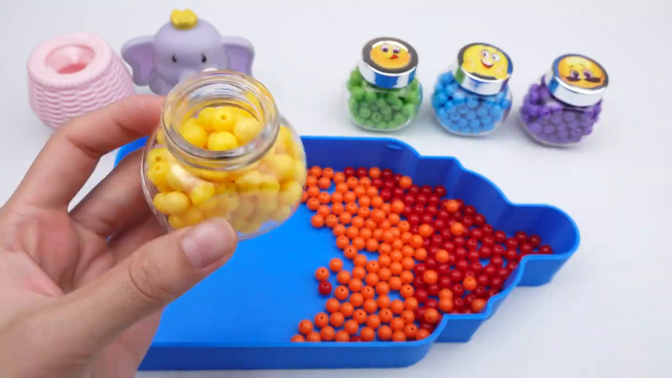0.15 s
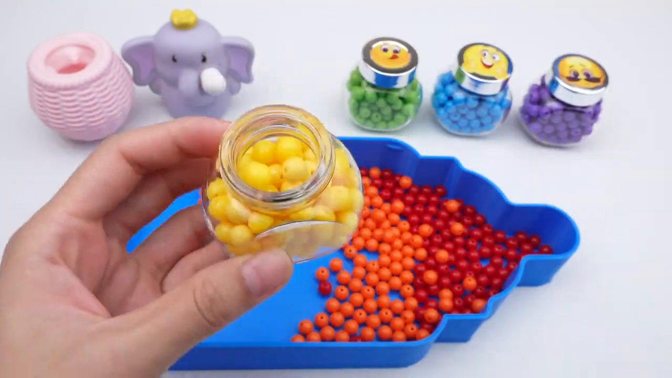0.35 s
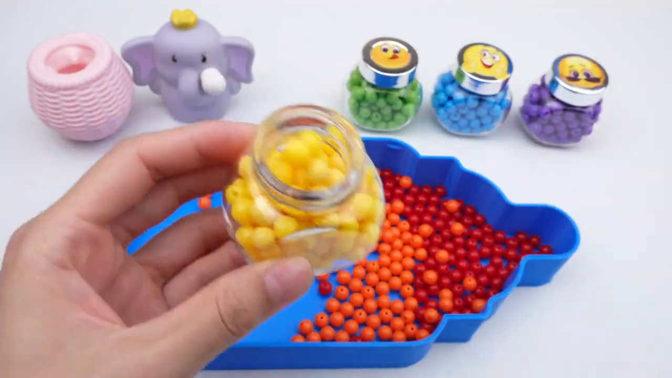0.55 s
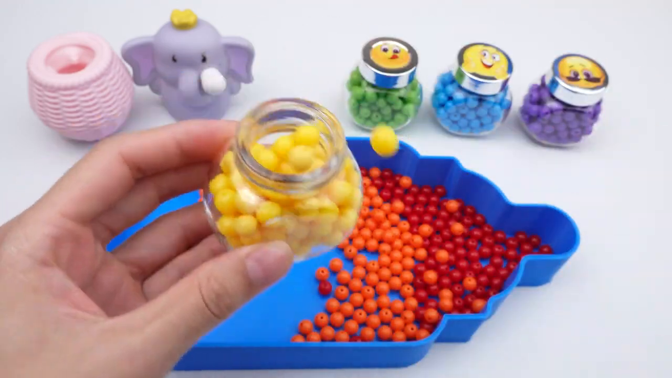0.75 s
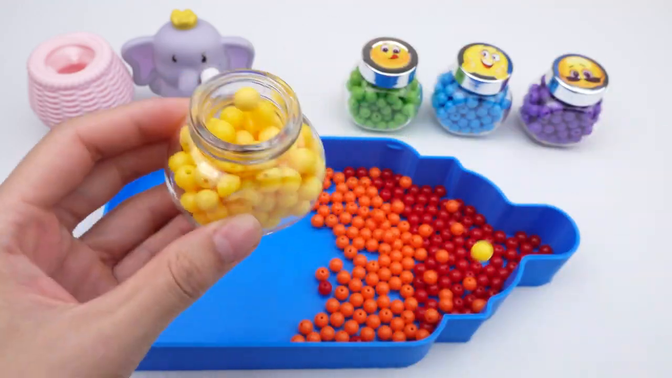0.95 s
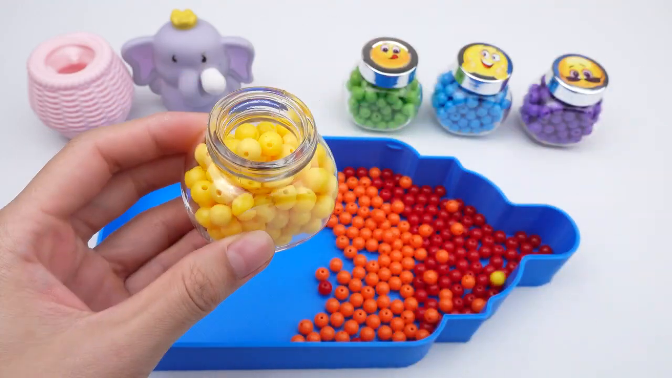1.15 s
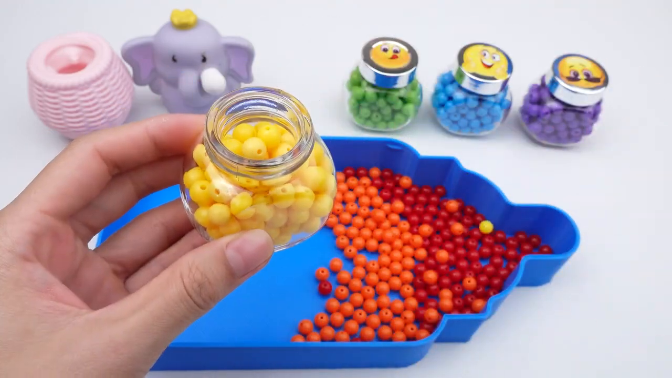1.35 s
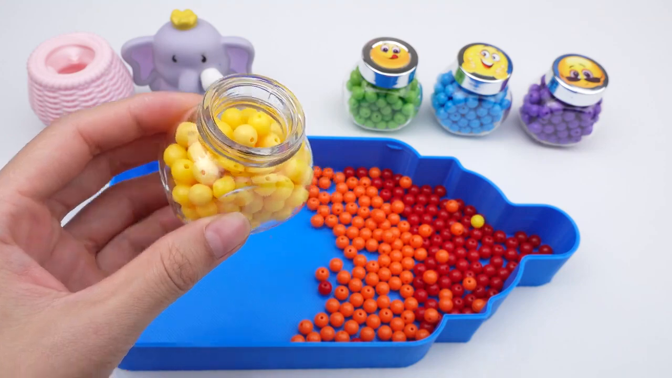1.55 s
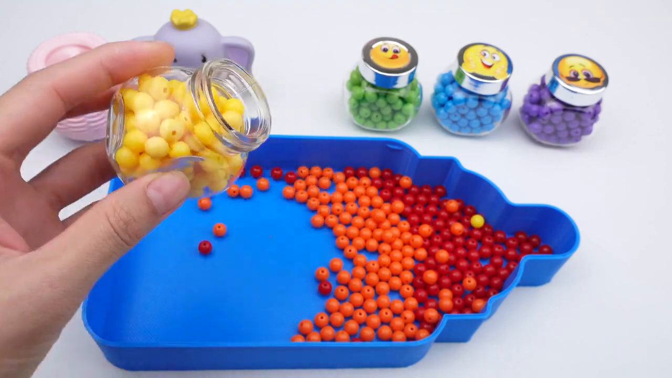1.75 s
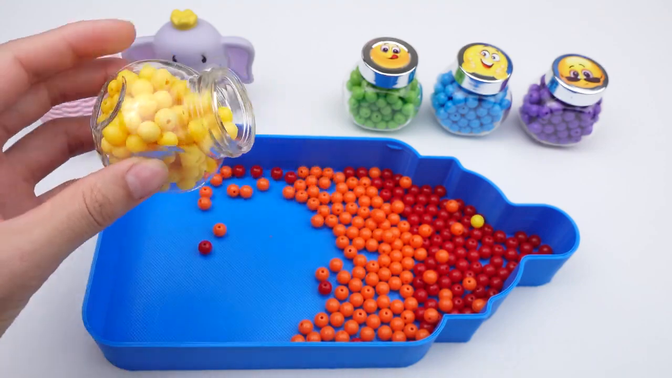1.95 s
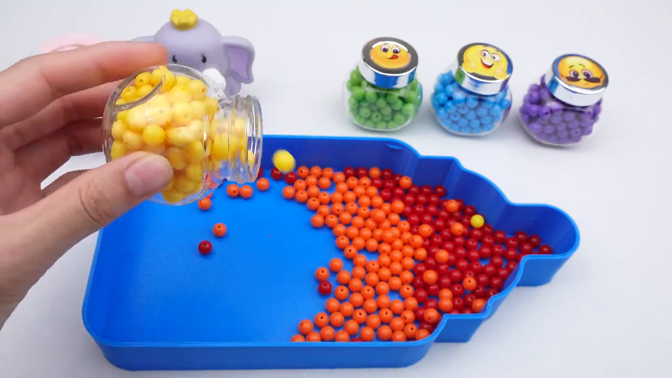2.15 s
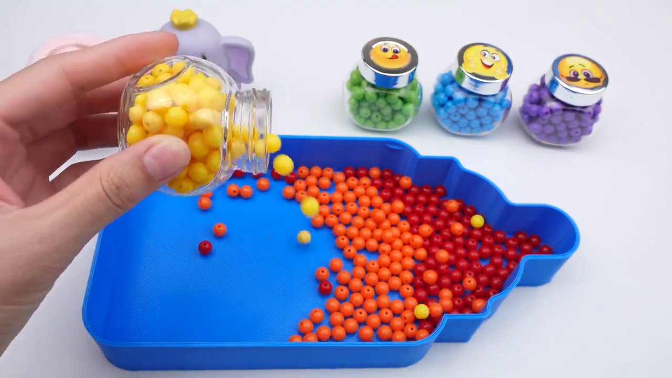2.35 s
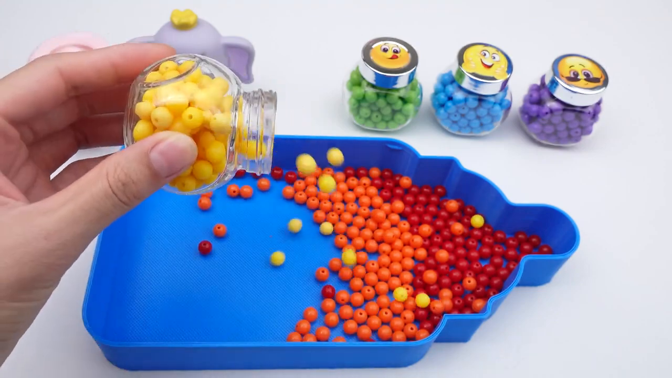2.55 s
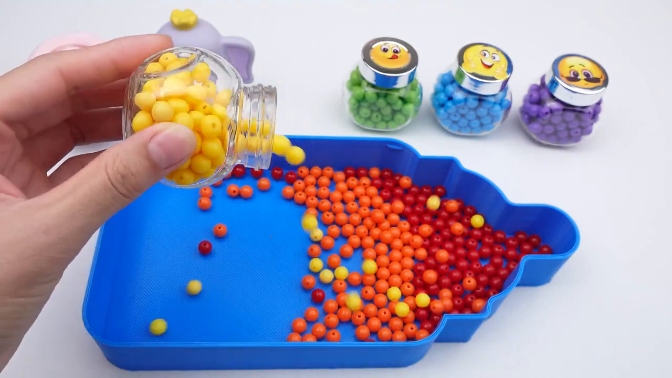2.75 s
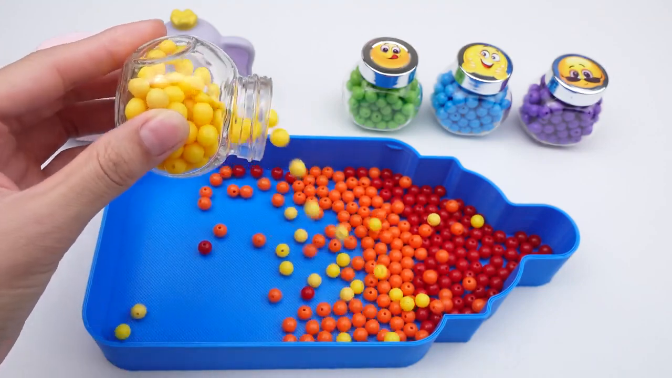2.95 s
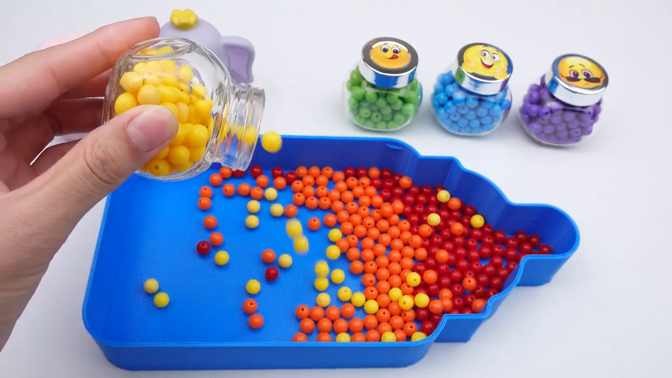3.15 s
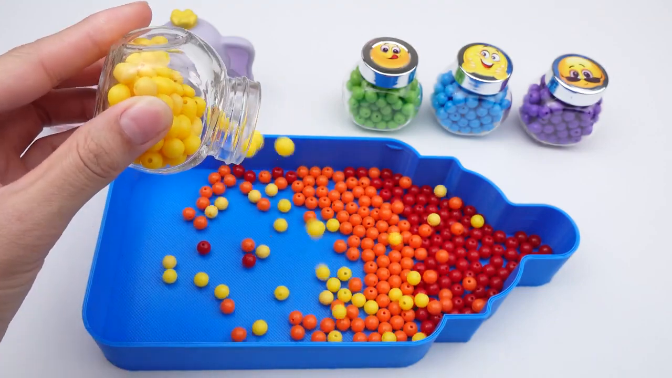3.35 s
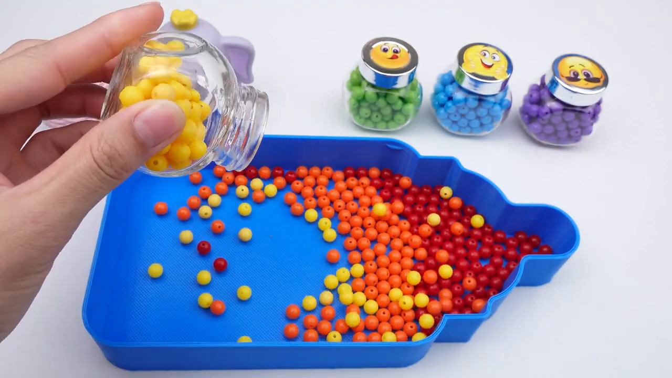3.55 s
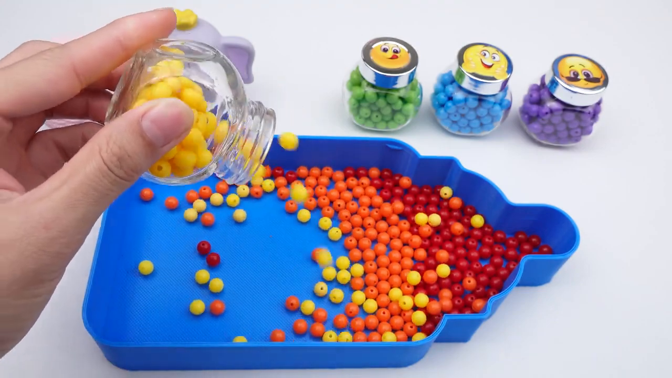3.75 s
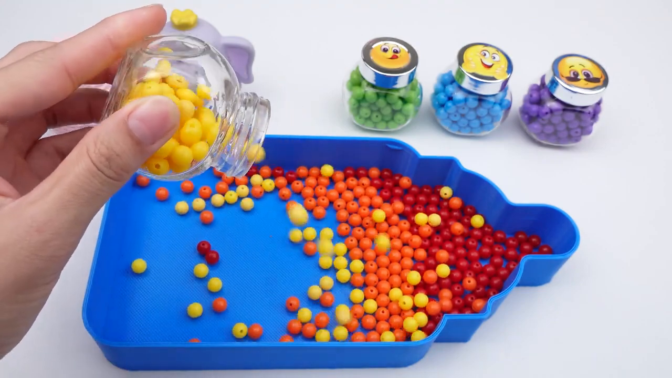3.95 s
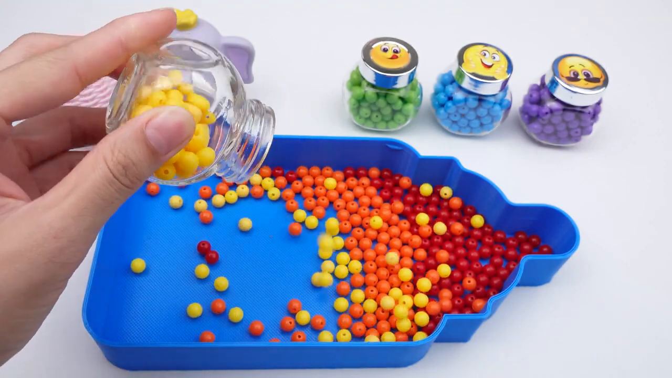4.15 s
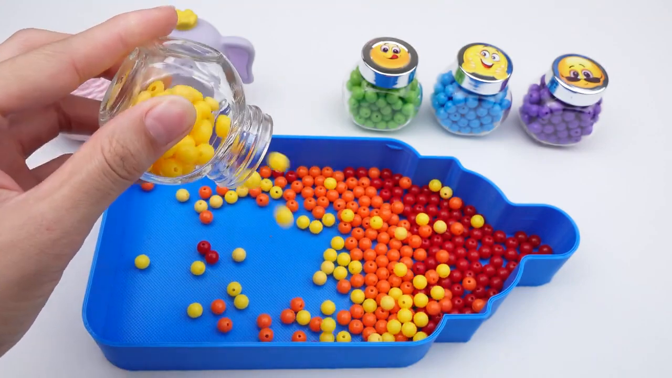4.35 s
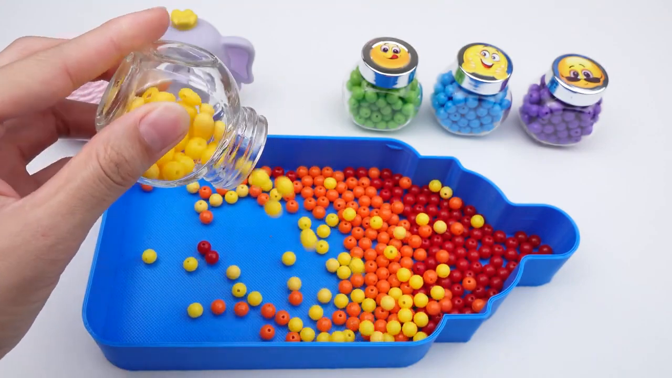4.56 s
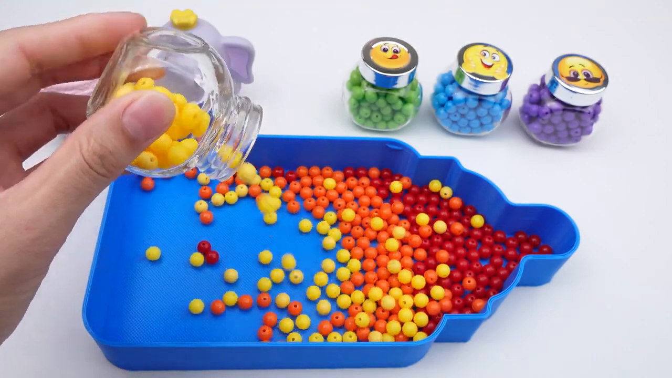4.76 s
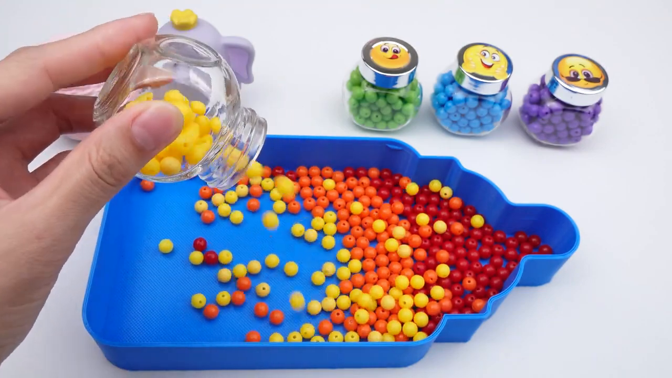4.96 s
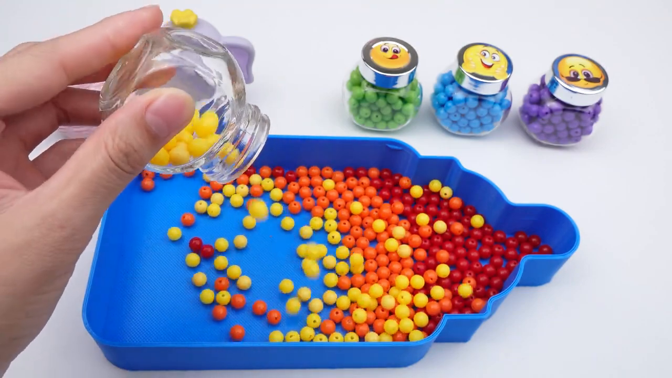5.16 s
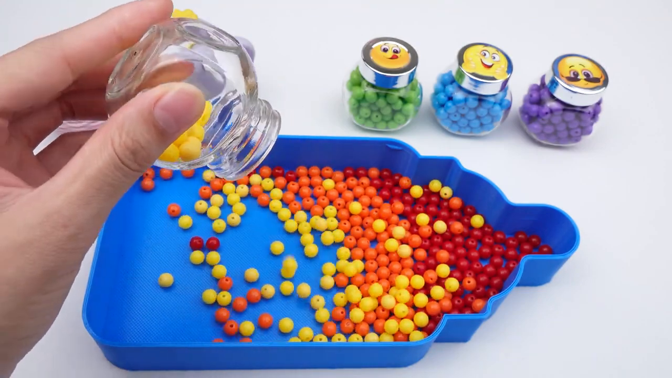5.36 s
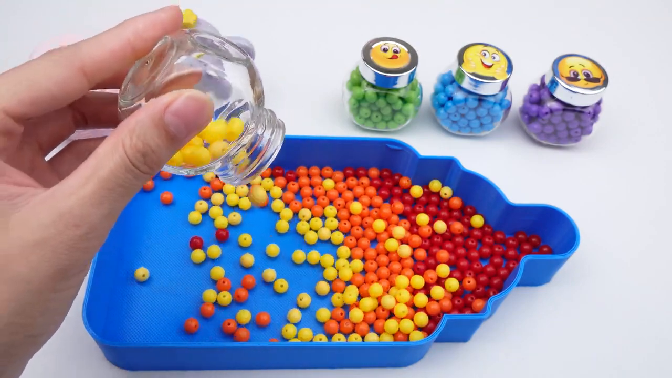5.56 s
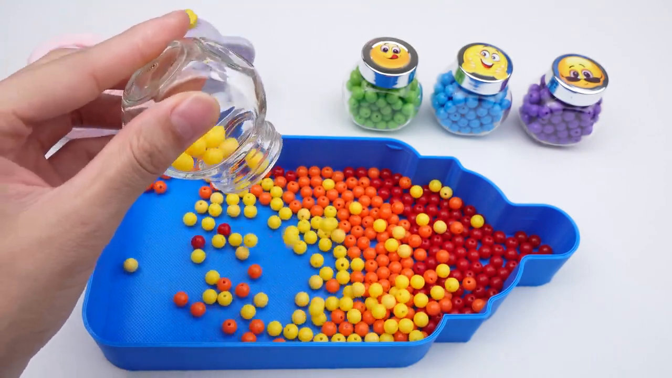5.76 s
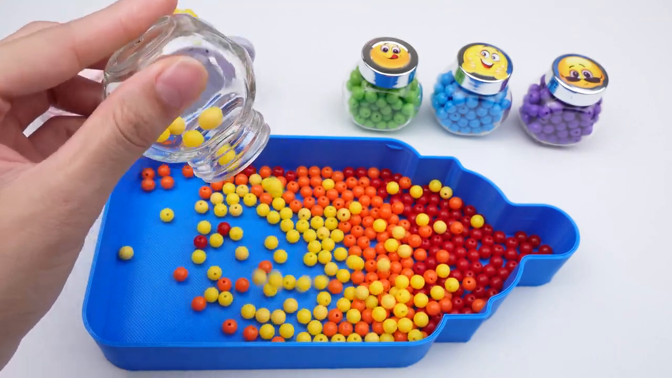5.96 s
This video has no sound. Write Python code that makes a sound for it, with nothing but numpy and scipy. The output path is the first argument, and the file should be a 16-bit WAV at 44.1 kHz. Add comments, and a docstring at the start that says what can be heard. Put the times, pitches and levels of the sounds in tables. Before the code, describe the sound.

Bright glassy bead rattling in quick strokes, a short spill of knocks, a brief lull, then dense hard pattering of beads into a plastic tray.

```python
"""Hard beads are shaken in a small glass jar, a few spill, then the jar is tipped and pours into a plastic tray.
Each collision is a very short noise burst: beads in the jar tick and ring the glass,
falling beads knock on the tray and the heap, over the ringing modes of the tray.
Shaking comes in quick strokes, the pour in runs that end when the neck jams; both carry swarms of small collisions.
A close microphone in a small room hears it mostly on the left and overloads on the hardest knocks."""
import sys
import numpy as np
from scipy import signal
from scipy.fft import rfft, irfft, next_fast_len
from scipy.io import wavfile

SR = 44100
rng = np.random.default_rng(int(sys.argv[2]) if len(sys.argv) > 2 else 0)


def generate_wav(signal):
    """Clip the signal to [-1, 1] and save it as 16-bit WAV at the path in sys.argv[1]."""
    frames = np.transpose(np.atleast_2d(signal))
    scaled = np.clip(frames, -1, 1) * 32767
    pcm = np.round(scaled).astype(np.int16)
    wavfile.write(sys.argv[1], SR, pcm)


N = 264952
TIME = np.arange(N) / SR
SHAKING_S, SPILLING_S, POURING_S = (0.24, 1.26), (1.27, 1.7), (2.41, 6.01)  # (start, end)


def gain_of(db):
    """Decibels to a factor."""
    return 10 ** (np.asarray(db) / 20)


def read(points, hz):
    """A curve over frequency, joined by straight lines over log frequency."""
    f, value = np.transpose(points)
    return np.interp(np.log(hz + 1), np.log(f), value)


def unit(x):
    """Scales each row to energy 1."""
    return x / np.sqrt(np.sum(x ** 2, -1, keepdims=True) + 1e-20)


def convolve(x, response):
    """Passes x through a response, channel by channel."""
    return signal.fftconvolve(x, response, axes=-1)[:, :N]


def place(times_s, sounds):
    """Lays stereo sounds out at their times."""
    out = np.zeros((2, N + SR))
    for s, sound in zip(times_s, sounds):
        at = int(np.clip(s * SR, 0, N))
        out[:, at:at + sound.shape[-1]] += sound
    return out[:, :N]


def held(rows, rise_s, fall_db_per_s):
    """Gain that rises, holds for the length of each row and dies away; the loudest row wins."""
    gains = []
    for start_s, length_s, level_db in rows:
        rise = np.clip((TIME - start_s) / rise_s, 0, 1)
        past_end_s = np.maximum(TIME - start_s - length_s, 0)
        gains.append(rise * gain_of(level_db - fall_db_per_s * past_end_s))
    return np.max(gains, 0)


def swells(rows, half_s):
    """Gain that swells and sinks around each row's moment, down to 1/e at half_s."""
    return np.sqrt(sum(gain_of(db) ** 2 * np.exp(-2 * ((TIME - s) / half_s) ** 2) for s, db in rows))


def lumpy(per_s, depth_db):
    """A gain that wanders at random, in straight lines in dB between random points."""
    steps = np.interp(TIME * per_s, np.arange(1024), rng.standard_normal(1024))
    return gain_of(depth_db * np.clip(steps, -1.5, 1.5))


def collisions(colour, tilt_db_per_octave, spot_hz, spot_db, snap_s, body_s, body_db, likeness, size=1536):
    """One burst a collision: noise with a snap and a weaker body, causally coloured, of energy about 1."""
    half = size // 2
    t, hz = np.arange(half) / SR, np.fft.rfftfreq(size, 1 / SR)
    noise = rng.standard_normal((len(tilt_db_per_octave), 2, half))
    envelope = np.exp(-t / snap_s) + gain_of(body_db) * np.exp(-t / body_s)
    spectrum = rfft(noise * envelope, size)
    # the two sides hear alike, less so in the treble
    same = np.clip(likeness, 0, 1) / (1 + (hz / 12000) ** 2)
    spectrum[:, 1] = same * spectrum[:, 0] + np.sqrt(1 - same ** 2) * spectrum[:, 1]
    octaves = np.clip(np.log2((hz + 1) / 4000), -1, 2)
    spot = np.exp(-(np.log2((hz + 1) / spot_hz[:, None]) / 0.22) ** 2)
    db = read(colour, hz) + tilt_db_per_octave[:, None] * octaves + spot_db * spot
    # folded cepstrum: minimum phase, so nothing sounds ahead of the blow
    cepstrum = irfft(db * np.log(10) / 20)
    causal = np.exp(rfft(2 * cepstrum[:, :half], size))
    burst = unit(irfft(spectrum * causal[:, None])[..., :half])
    burst[:, 1] *= gain_of(0.83 * rng.standard_normal((len(burst), 1)))  # each bead strikes at another place
    return burst


def ring(modes, count, wander, size=3072):
    """The modes of a body, struck count times, each time with other shares; loose beads detune them slightly."""
    t, out = np.arange(size) / SR, np.zeros((count, 2, size))
    for hz, db, t60_s in modes:
        share = rng.standard_normal((count, 2, 1))
        share[:, 1] = (share[:, 0] + share[:, 1]) / np.sqrt(2)
        share = (share + np.sign(share)) / 2
        pitch_hz = hz * (1 + wander * rng.standard_normal((count, 1, 1)))
        fade = gain_of(-60 * t / t60_s) * (1 - t / t[-1]) ** .5
        swing = np.sin(2 * np.pi * pitch_hz * t) * fade
        speed = np.diff(swing, prepend=0)  # the wall's speed radiates
        out += share * gain_of(db) * unit(speed)
    return out


def rung(times_s, blow_db, modes, wander, count=28):
    """Each blow sets off one of many ways the body can ring."""
    ways = ring(modes, count, wander)
    picks = rng.integers(0, count, len(times_s))
    return place(times_s, (gain_of(db) * ways[k] for db, k in zip(blow_db, picks)))


def swarm(source, gain, span_s, per_s, spread_db, last_column, ring_db):
    """Many small random collisions of one kind within a span of time, their strength following a gain."""
    start_s, end_s = span_s
    count = int(per_s * (end_s - start_s))
    when, strength, hardness, other = rng.random((count, 4)).T
    s = start_s + (end_s - start_s) * (np.arange(count) + 3 * when - 1) / count
    blow = gain_of(spread_db * strength)
    # mean power follows the gain, however dense the swarm
    blow = blow / np.sqrt(np.mean(blow ** 2) * per_s / SR)
    blow_db = 20 * np.log10(np.interp(s, TIME, gain) * blow + 1e-9)
    last = np.interp(other, [0, 1], last_column)
    return source(np.transpose([s, blow_db, 14 * (hardness - .5), last]), ring_db)


def hollow(modes, gain):
    """Broad resonances kept sounding by countless small blows: noise with spectral peaks."""
    size = next_fast_len(N)
    hz = np.fft.rfftfreq(size, 1 / SR)
    stir = rng.standard_normal((2, size))
    stir[1] = stir[0] + .5 * stir[1]
    shape = sum(gain_of(db) / (1 + ((hz - f) * decay_s / 2) ** 2) ** 2 for f, db, decay_s in modes)
    return unit(irfft(rfft(stir) * shape, size)[:, :N]) * np.sqrt(N) * gain


def hiss(floor_db):
    """Faint, thin background hiss: high-passed noise."""
    thin = signal.butter(4, 3800, "high", fs=SR, output="sos")
    return gain_of(floor_db) * signal.sosfilt(thin, rng.standard_normal((2, N)))


def room():
    """A diffuse tail, each band dying at its own speed."""
    # reverberation: pitch_hz, t60_s
    band_t60 = [(300, 0.41), (1000, 0.38), (2500, 0.5), (6000, 0.4), (10000, 1), (16000, 0.16)]
    # tail colour: pitch_hz, level_db (relative)
    band_level = [(300, -11.5), (1500, 2), (4000, 6), (8000, -8), (12000, -12.5), (16000, 4)]
    onset = np.clip(TIME[:SR] / 0.0048 - .5, 0, 1)
    hz, t, z = signal.stft(rng.standard_normal((2, SR)) * onset, SR, nperseg=256)
    decay = gain_of(-60 * t / read(band_t60, hz)[:, None])
    colour = gain_of(read(band_level, hz))[:, None]
    return unit(signal.istft(z * decay * colour, SR, nperseg=256)[1])


def dying_rattle(tail, blow_db):
    """The room still rings from a rattle just before."""
    echo = convolve(jar([(0.01, blow_db, 0, -3)], ring_db=4), tail)
    return np.roll(echo, -SR // 20, -1) * (TIME < 1)  # shifted so that only its tail is left at the start


def jar(rows, ring_db):
    """Bright ticks of bead on bead and on glass, with the thin ring of the glass."""
    # tick spectrum: pitch_hz, level_db (relative)
    tick_colour = [(100, -44.5), (1500, -39), (2700, -25.5), (3400, -18.5), (4000, -8.5), (5200, -8.5),
                   (6200, -3.5), (9000, -2), (12500, -3), (15500, -4.5), (17000, -8.5)]
    # glass modes: pitch_hz, level_db (relative to the ring), t60_s
    glass_modes = [(4030, -13, 0.026), (5630, -17, 0.045), (8000, -19.5, .04), (9600, -27, .04),
                   (11260, -15.5, 0.027), (14206, 5, 0.015), (14000, -7, 0.0412), (13950, -9.5, 0.019),
                   (15600, -20, 0.039), (15350, -11.5, 0.027)]
    # the jar's upper resonance sinks as it is tipped: time_s, pitch_hz
    cavity = [(1.3, 4000), (2.25, 3120)]
    s, blow_db, hardness, glass_db = np.transpose(rows)
    cavity_hz = np.interp(s, *np.transpose(cavity))
    ticks = collisions(tick_colour, 0.62 * hardness, cavity_hz, spot_db=4, snap_s=0.0013,
                       body_s=0.0024, body_db=-16, likeness=0.41)
    ringing = rung(s, blow_db + glass_db + ring_db, glass_modes, wander=0.0087)
    return place(s, ticks * gain_of(blow_db)[:, None, None]) + ringing


def jostling_beads(flow):
    """In the jar: single ticks, the rattle of each stroke, and glassy sliding while it empties."""
    # clearest ticks: time_s, blow_db (relative), hardness (relative treble tilt), glass_ring_db (relative)
    jar_hits = [(0.2407, 7.5, 13, -9), (0.2687, 5.5, -2, -21), (0.2942, 5.5, -2, -15),
                (0.3175, 15, -10, -8), (0.3403, 11, 8, -3), (0.3754, 13.5, 5.5, -20), (0.3948, 12.5, 4, -7),
                (0.453, 13, -5, -19.5), (0.4918, 11.5, -1, -20), (0.499, 10.5, 1, -15),
                (0.5679, 9, -10, 0.5), (0.6505, 9, 8, -1.5), (0.7274, 13, -5, -13), (0.9116, 9.5, 7, -7),
                (0.9709, 6, 10, -8), (1.1123, 10.5, -4, 1.5), (1.1398, 14, 3.5, -4.5),
                (1.167, 12.5, -8.5, -7), (1.2176, 16.5, 1, -12), (1.7089, 1.5, 0, -24),
                (1.7811, -6.5, -5, -2), (1.7927, -6.5, -5, 3.5), (1.8645, -5, -3, -8),
                (1.8738, -12, -9, -1), (1.8993, -10, -6, -19.5), (1.9092, 7, 21, -6.5),
                (1.9468, 5.5, 11, -2.5), (1.9737, -2, 7, 0), (2.1059, -13, 12, -19),
                (2.122, -15.5, 14, -20), (2.1443, -9, 9, -13), (2.1776, -6, 5, -4), (2.1998, 3, 8, -3),
                (2.2153, -6, 4, -5), (2.2281, -11, 8, 0), (2.2524, 5, 7.5, -2), (2.3768, 1, -2, 5.5),
                (3.7972, 7.5, -4, 3.5), (5.0481, -2, -5, 8), (5.6552, 13.5, 6.5, -7.5),
                (5.7768, 7, 18, 1.5), (5.9015, 5.5, -6, 5)]
    # strokes of the shaking hand, each throwing the beads against the glass: time_s, level_db (relative)
    strokes = [(0.277, -30), (0.35, -26), (0.395, -19), (0.452, -18.5), (0.545, -20), (0.6, -13.5),
               (0.69, -15.5), (0.772, -13.5), (0.853, -12), (0.922, -14), (1.0, -15.5), (1.072, -13),
               (1.18, -21.5)]
    # the beads left in the jar slump towards the neck: time_s, level_db (relative)
    slumps = [(2.48, -32), (2.56, -36), (2.75, -41), (2.86, -30), (3.2, -35), (3.8, -28.5), (4.445, -23.5),
              (5.03, -28), (5.68, -28.5), (5.79, -31)]
    ticks = gain_of(-1) * jar(jar_hits, ring_db=-2.5)
    shaken = swells(strokes, half_s=0.023) + gain_of(-35)
    rattle = gain_of(0.5) * swarm(jar, shaken, SHAKING_S, per_s=500, spread_db=19,
                                  last_column=(-16, -4), ring_db=-1.5)
    sliding = swells(slumps, half_s=0.027) + gain_of(-21.5) * flow
    slide = gain_of(2) * swarm(jar, sliding, POURING_S, per_s=130, spread_db=15,
                               last_column=(-3, 5), ring_db=1)
    return ticks + rattle + slide


def nearby(early_s, size=2048):
    """Reflections from the table, the jar and the tray walls: sparse random taps."""
    t = np.arange(size) / SR
    taps = rng.standard_normal((2, size)) * (rng.random((2, size)) < .05) * (t > .002)
    return unit(taps * np.exp(-t / early_s))


def hum(flow):
    """The air in the shaken jar, a hollow tone under the pour, and the neck under rolling beads."""
    # resonances of jar air, the hollow tone under the pour, jar neck: pitch_hz, level_db (relative), decay_s
    # (longer = narrower)
    air_modes = [(933, -8.5, 0.034), (1032, 5, 0.063), (1189, -9, 0.019)]
    pour_tone_modes = [(1248, -3, 0.066), (1351, -2.5, 0.043), (1622, 2.5, 0.05)]
    neck_modes = [(3260, 1, 0.0096), (4230, 0, 0.0053)]
    # shaking stirs the air, less as it goes on: start_s, length_s, level_db (before the lumps)
    stirring = [(0.25, 0.27, -35.5)]
    # the first beads roll into the neck: start_s, length_s, level_db (before the lumps)
    rolling = [(2.15, 0.081, -50.5)]
    in_hand = np.clip((SHAKING_S[1] - TIME) / 0.02, 0, 1)
    stirred = held(stirring, rise_s=0.041, fall_db_per_s=17.5) * in_hand * lumpy(per_s=35, depth_db=4.0)
    air = hollow(air_modes, stirred)
    pour_tone = gain_of(-17.0) * hollow(pour_tone_modes, flow * (TIME > POURING_S[0]))
    bumping = held(rolling, rise_s=0.032, fall_db_per_s=200) * lumpy(per_s=110, depth_db=8)
    return air + pour_tone + hollow(neck_modes, bumping)


def tray(rows, ring_db):
    """Knocks on plastic and on the heap, with the tray ringing under them."""
    # knock spectrum: pitch_hz, level_db (relative)
    knock_colour = [(100, -41), (1100, -40.5), (1310, -5.5), (1520, -38.5), (1780, 0.5), (3000, 4),
                    (4500, 1.5), (5400, 0.5), (7000, 1), (9000, -5), (11500, -13.5), (16000, -17)]
    # tray modes: pitch_hz, level_db (relative to the ring), t60_s
    tray_modes = [(719, -40, 0.11), (1595, -36, 0.2), (1748, -12.5, 0.05), (1787, -17, 0.075),
                  (1952, -18, .09), (2280, -16.5, 0.22), (2444, -18.5, 0.17), (2652, -15.5, 0.18),
                  (3095, -16.5, 0.21), (4396, -10, 0.075), (4735, -13.5, 0.091), (5530, -22, .06)]
    s, blow_db, hardness, spot_hz = np.transpose(rows)
    knocks = collisions(knock_colour, 0.85 * hardness, spot_hz, spot_db=5.5, snap_s=0.00098,
                        body_s=0.0049, body_db=-9, likeness=0.74)
    ringing = rung(s, blow_db + ring_db, tray_modes, wander=0.011)
    return place(s, knocks * gain_of(blow_db)[:, None, None]) + ringing


def falling_beads(flow):
    """In the tray: the hardest landings, ordinary landings, the spill, and the many rebounds."""
    # beads landing hardest or alone: time_s, blow_db (relative), hardness (relative treble tilt),
    # spot_hz (favoured by the struck spot)
    tray_hits = [(1.0066, 18.5, 2.5, 6150), (1.2724, 23, 6, 2170), (1.2919, 16, -2, 4280),
                 (1.3338, 18.5, -2, 2900), (1.3497, 15, 5.5, 3200), (1.3851, 16.5, 3, 3230),
                 (1.3951, 14, 0, 5000), (1.4141, 18, 2, 2920), (1.4556, 13, -1, 3930),
                 (1.4835, 4, -2, 4040), (1.5543, 8.5, 4.5, 6300), (1.6026, 10, 2, 4670),
                 (1.6327, -10, 5, 5700), (1.6562, -5.5, 1.5, 4140), (2.4081, 21, 9, 5950),
                 (2.4387, 15, 7, 4600), (2.4633, 20.5, 4, 3420), (2.4662, 17, 2.5, 1890),
                 (2.5293, 17.5, -5.5, 4240), (2.5554, 22, 7.5, 3980), (2.6006, 21.5, 0, 2710),
                 (2.6178, 17.5, 2, 4670), (2.6555, 23, 0.5, 2680), (2.6922, 17.5, 3.5, 2070),
                 (2.7298, 17, -1.5, 4540), (2.749, 17, 5, 2330), (2.7858, 18.5, 3.5, 4500),
                 (2.8557, 18.5, -1, 2190), (2.8949, 19.5, 4, 4320), (2.9193, 19, -1, 3260),
                 (2.9583, 15.5, -2.5, 2880), (2.9673, 16.5, 1, 2890), (3.0184, 23.5, 4, 4260),
                 (3.0262, 14.5, 3, 4460), (3.0525, 18, 3.5, 3400), (3.1005, 21.5, 6.5, 4830),
                 (3.1266, 19.5, 0, 2950), (3.2004, 18.5, 4, 4330), (3.2656, 17.5, 3, 2920),
                 (3.2895, 21, 3.5, 2720), (3.3883, 22.5, -4.5, 4600), (3.432, 21, 6, 5600),
                 (3.4891, 21.5, -6, 3000), (3.5268, 21.5, -4, 2920), (3.599, 22.5, 6.5, 6130),
                 (3.6644, 21.5, 2, 3370), (3.7298, 18.5, -3, 4770), (3.8349, 15, 5, 6760),
                 (3.8932, 15, 9, 4670), (3.9117, 19, 1, 7200), (3.9491, 20, 5, 3750),
                 (3.9825, 18.5, 6.5, 7664), (4.0524, 16, 3, 4400), (4.0806, 22, 2, 2920),
                 (4.1312, 18.5, 4.5, 4770), (4.1676, 21, 4.5, 4540), (4.2219, 23.5, 2.5, 5270),
                 (4.2527, 17, 8, 7700), (4.2793, 19.5, 0, 2700), (4.3216, 20, -1, 7060),
                 (4.3527, 18.5, 6, 4430), (4.4739, 21, 1.5, 3150), (4.5604, 20, -0.5, 3080),
                 (4.5817, 26, 8, 6200), (4.6217, 14, -5, 3200), (4.7058, 19.5, 9, 6660),
                 (4.7293, 18.5, 0.5, 3820), (4.7577, 17.5, 6, 6260), (4.7951, 13, 1, 4400),
                 (4.8354, 19, 4, 3160), (4.8759, 19.5, -1, 4600), (4.9618, 18.5, 4.5, 2520),
                 (4.988, 18.5, 7, 4340), (5.0978, 21, 0.5, 3420), (5.1222, 17.5, -2, 3640),
                 (5.1753, 21.5, 7.5, 4500), (5.1975, 15, -4, 2740), (5.2453, 20.5, -3, 3060),
                 (5.3159, 17, 0.5, 2940), (5.4063, 17.5, 1, 2940), (5.4907, 17, 0.5, 3500),
                 (5.5353, 18, -9, 2720), (5.5971, 10, -2.5, 2750), (5.6757, 13.5, -2.5, 2800),
                 (5.7419, 20, 3.5, 2060), (5.8121, 18, -7.5, 2350), (5.8346, 19.5, 4, 2860),
                 (5.9086, 15, 3, 2630), (5.9313, 20.5, -1, 3030), (5.9763, 21.5, 3, 7660)]
    spots_hz = (2000, 6500)
    hard = gain_of(-2.5) * tray(tray_hits, ring_db=-7)
    landings = gain_of(1.5) * swarm(tray, flow, POURING_S, per_s=36, spread_db=4.5,
                                    last_column=spots_hz, ring_db=-5.5)
    spill = gain_of(2) * swarm(tray, flow, SPILLING_S, per_s=600, spread_db=13,
                               last_column=spots_hz, ring_db=-4.5)
    rebounds = gain_of(4.5) * swarm(tray, flow, POURING_S, per_s=420, spread_db=22,
                                    last_column=spots_hz, ring_db=-3.5)
    return hard + landings + spill + rebounds


def scene():
    """Jar and tray, close on the left, with their reflections and the room."""
    # runs of beads leaving the neck, a short spill and then the pour: start_s, length_s, level_db (relative)
    runs = [(1.272, 0.08, -22), (2.41, 0.2, -24.5), (2.65, 1.092, -21.5), (3.92, 0.38, -21.5),
            (4.3, 0.27, -24), (4.57, 0.93, -21), (5.74, 0.39, -22)]
    flow = held(runs, rise_s=0.02, fall_db_per_s=133.5)  # beads bounce to rest after a run stops
    in_tray, in_jar = falling_beads(flow), jostling_beads(flow)
    dry = in_tray + in_jar + hum(flow)
    early = convolve(gain_of(-17) * in_tray + gain_of(-10.5) * in_jar, nearby(early_s=0.006))
    tail = room()
    wet = gain_of(-13.0) * convolve(dry, tail) + dying_rattle(tail, blow_db=-13) + hiss(floor_db=-57.5)
    left_right_close, left_right_room = gain_of([[0], [-14]]), gain_of([[0], [-12]])
    return (dry + early) * left_right_close + wet * left_right_room


def record(dry):
    """A microphone with little bass; its input overloads, a little lopsidedly, on the hardest knocks."""
    thin = signal.sosfilt(signal.butter(1, 200, "high", fs=SR, output="sos"), dry)
    clipped = np.clip(thin, -1, 1)
    bent = clipped + gain_of(-45) * clipped ** 2  # adds a small thud to each click
    band_limit = signal.firwin(255, 15900, window=("kaiser", 7), fs=SR)  # low-pass, Hz
    return signal.oaconvolve(bent, band_limit[None], "same")


dry = scene()
out = record(dry)
generate_wav(out)
```